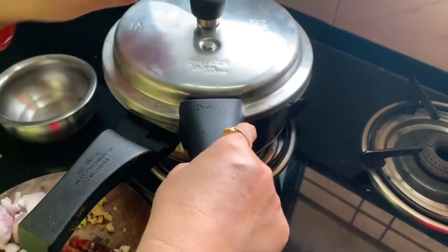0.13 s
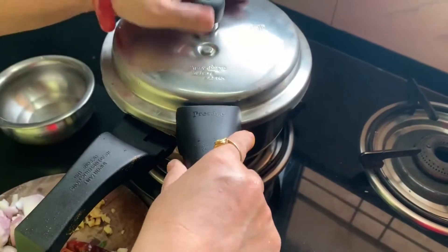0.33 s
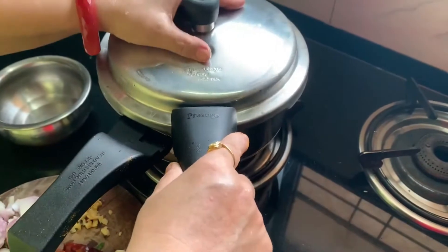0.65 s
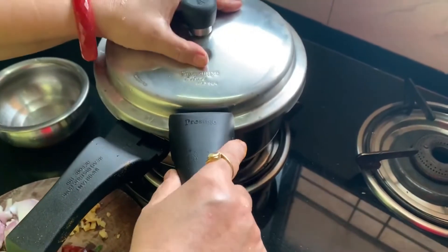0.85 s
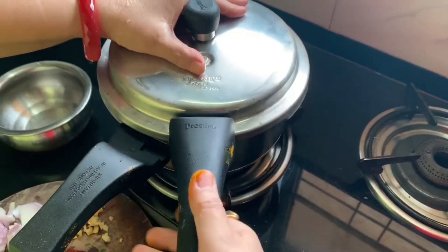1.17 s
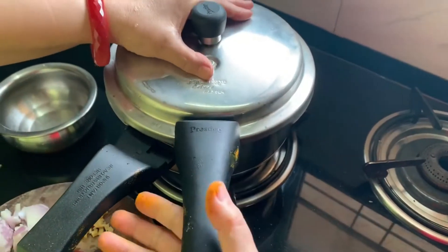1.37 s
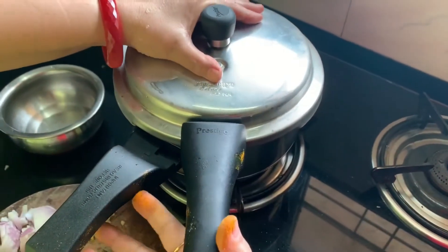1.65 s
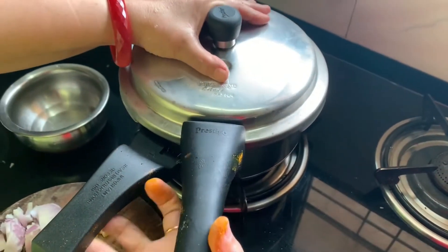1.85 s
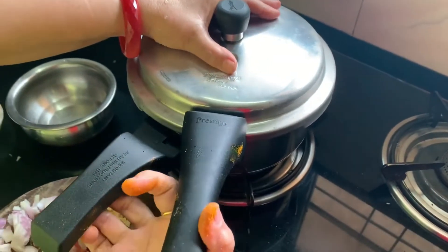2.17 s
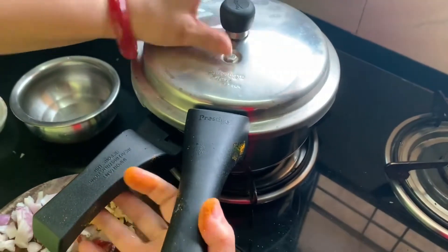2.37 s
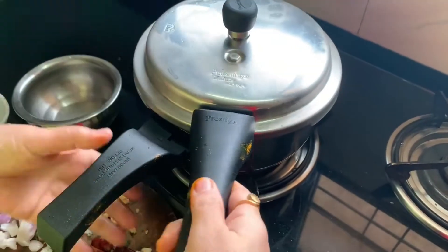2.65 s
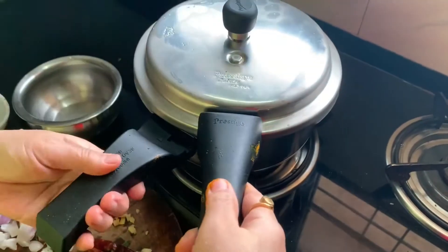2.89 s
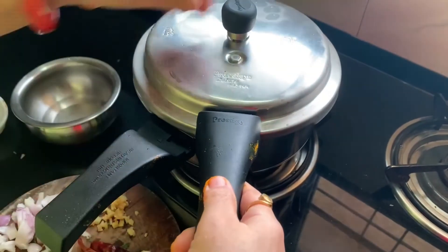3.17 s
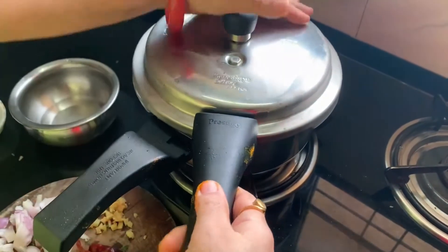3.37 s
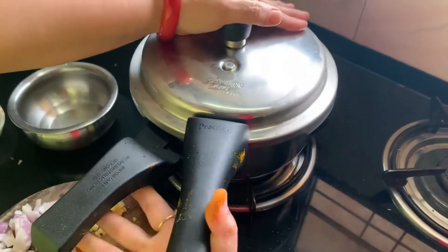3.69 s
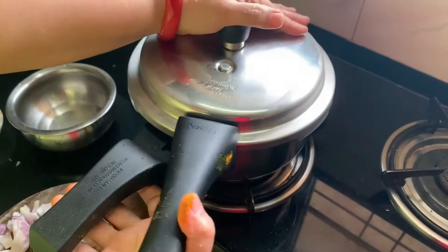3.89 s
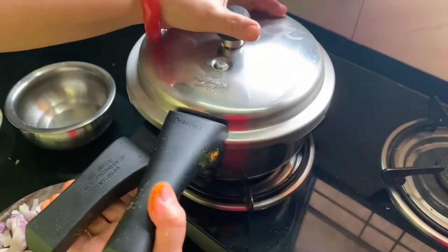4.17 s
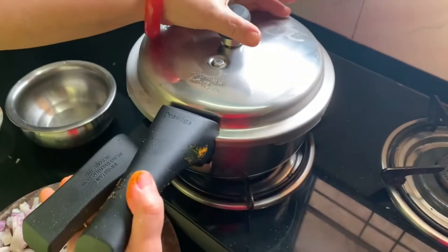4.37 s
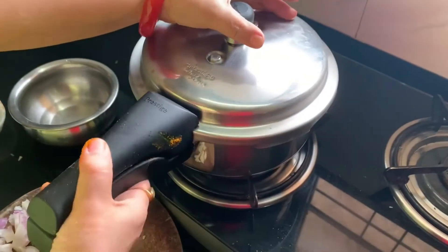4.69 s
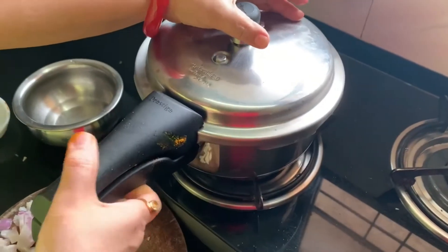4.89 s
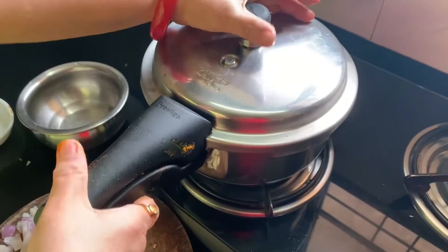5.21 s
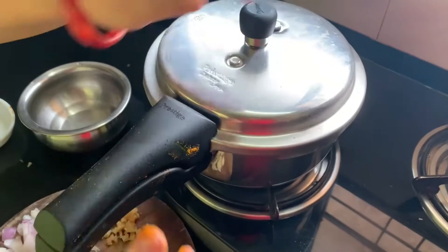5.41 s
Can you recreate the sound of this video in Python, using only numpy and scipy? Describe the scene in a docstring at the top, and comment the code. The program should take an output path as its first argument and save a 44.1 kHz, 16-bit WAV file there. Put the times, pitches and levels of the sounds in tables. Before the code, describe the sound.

A pressure cooker lid shifts on its pot with a cluster of light, hollow knocks, then scattered taps, soft thumps and the ticking of a loose fitting. A sharp, bright metal clack rings out, and a second, fuller one follows as the lid seats. Quieter handling knocks finish the action. The microphone is close, in a small kitchen with short reflections and a faint bed of hiss and rumble.

```python
"""A metal pressure cooker lid is worked into its pot and locked, close up in a small kitchen.
Handling gives dull knocks (a contact, a clonk of the handle, the pot's low answer) and soft bumps as
the pot rocks on the stove. A loose fitting ticks, and the rim clacks, bounces and rings, twice loudly.
How firmly the lid sits shapes the ring, the bounces and the bass of the knocks.
Hiss and a low room rumble lie underneath."""
import sys
import numpy as np
from scipy import signal
from scipy.fft import rfft, irfft
from scipy.io import wavfile
from scipy.ndimage import uniform_filter1d

SR = 44100
rng = np.random.default_rng(int(sys.argv[2]) if len(sys.argv) > 2 else 0)


def put_to_file(sound):
    """Save the sound as 16-bit audio at rate SR, in the file named by the first command-line argument."""
    columns = np.atleast_2d(sound).T  # one column per channel
    safe = np.clip(columns, -1, 1)
    whole_steps = np.round(safe * 32767)
    wavfile.write(sys.argv[1], SR, whole_steps.astype(np.int16))


N = 244710
T = np.arange(SR * 2 // 3) / SR  # time axis of one hit
LEAD_S = .02  # scuff before a blow peaks


def amp(db):
    """Decibels to gain."""
    return 10 ** (np.asarray(db) / 20)


def curve_at(points, hz):
    """Reads a breakpoint curve on a log-frequency axis."""
    freqs, values = np.transpose(points)
    return np.interp(np.log(hz + 1), np.log(freqs), values)


def add(mix, start_s, sound):
    """Lays a stereo sound into the mix."""
    part = mix[:, max(round(start_s * SR), 0):][:, :sound.shape[1]]
    part += sound[:, :part.shape[1]]


def eq(x, points):
    """Filters x by a curve of (freq_hz, gain_db)."""
    size = x.shape[-1]
    return irfft(rfft(x) * amp(curve_at(points, np.fft.rfftfreq(size, 1 / SR))), size)


def normalise(x):
    """Scales a stereo hit to the energy of 20 ms at rms 1."""
    return x / np.sqrt((x ** 2).sum() / (2 * SR * .02))


def decay(t60_s):
    """Exponential fade, 60 dB down at t60_s."""
    return np.exp(-np.log(1000) * T / t60_s)


def blow(attack_s, t60_s):
    """Envelope: surfaces scuff with growing force, meet at LEAD_S, and the sound dies."""
    return np.exp(np.minimum((T - LEAD_S) / attack_s, -np.log(1000) * (T - LEAD_S) / t60_s))


# Stereo image of the room, centred bass and wide treble: freq_hz, correlation
ROOM_IMAGE = [(60, 0.98), (160, 1), (300, 0.98), (600, 0), (1100, 0.2), (12000, 0)]
def noise(spectrum, size, image=ROOM_IMAGE):
    """Coloured stereo noise of rms 1, its width set band by band."""
    left, spare = rfft(rng.standard_normal((2, size)))
    alike = np.clip(curve_at(image, np.fft.rfftfreq(size, 1 / SR)), -1, 1)
    right = alike * left + np.sqrt(1 - alike ** 2) * spare
    x = eq(irfft(np.array([left, right]), size), spectrum)
    return x / x.std()


# Colour of the hiss and rumble: freq_hz, gain_db
BED_SPECTRUM = [(25, -13), (50, 4.5), (90, 7), (160, 10.5), (250, 4.5), (400, 4.5), (530, -0.5), (700, 3),
                (950, 1.5), (1300, 2), (1900, -2.5), (3000, 0), (6500, 0), (7500, 1), (8400, -2),
                (10000, 2.5), (11500, -1.5)]
# Stereo image of the bed: freq_hz, correlation
BED_IMAGE = [(60, 1), (160, .99), (300, 0.79), (600, 0.11), (1100, -0.2), (7300, 0.34), (7750, -1),
             (9050, -1), (9700, 0.78)]
# How much each band swells: freq_hz, depth_ratio
BED_SWELL = [(200, .9), (900, .8), (2200, 1), (5000, .7)]
def room_tone(level_db=-42, swell_db=3.4):
    """A bed of hiss and low rumble that swells in irregular patches of time and frequency."""
    hz, t, bands = signal.stft(noise(BED_SPECTRUM, N, BED_IMAGE), SR, nperseg=1024)
    patches = uniform_filter1d(rng.standard_normal((len(t), len(hz))), size=12, axis=0)
    patches = uniform_filter1d(patches, size=6, axis=1).T
    swell = amp(swell_db * curve_at(BED_SWELL, hz)[:, None] * patches / patches.std())
    return amp(level_db) * signal.istft(bands * swell, SR, nperseg=1024)[1][:, :N]


def strike(modes, attack_s, spread_db=2.5, right_lag_s=0.00018):
    """Damped modes set off by one blow, with a new balance and slight detuning each time."""
    t = T - LEAD_S - np.array([[0], [right_lag_s]])
    ring = 0
    for hz, t60_s, db in modes:
        envelope = amp(db + spread_db * rng.standard_normal()) * blow(attack_s, t60_s)
        cycles = hz * rng.uniform(1.0, 1.015) * t + rng.random()
        ring = ring + envelope * np.sin(2 * np.pi * cycles)
    return normalise(ring)


def focus(modes, focus_hz, db_per_octave=-11.5):
    """The place of a blow brings out the modes near one pitch."""
    return [(hz, t60_s, db + db_per_octave * abs(np.log2(hz / focus_hz))) for hz, t60_s, db in modes]


# Harder knocks build up faster: contact_db, attack_s
CONTACT_ATTACK = [(-42, 0.0056), (-40, 0.0035)]
# Modes of the hollow pot wall: pitch_hz, t60_s, level_db
WALL_MODES = [(1370, 0.039, -4), (1717, 0.033, 2), (2040, 0.087, 3.5), (2250, 0.11, 1), (2610, 0.078, 0),
              (3025, 0.052, 1)]
# Dense modes that blur into a thud: freq_hz, gain_db
THUD_SPECTRUM = [(100, -29), (250, -6), (420, 0), (530, -0.5), (750, 0), (1100, -0.5), (1500, -1),
                 (1850, -1.5), (2400, 0.5), (3200, -2.5), (4200, -12), (6500, -9), (12000, -69)]
def contact(level_db, treble_db):
    """The front of a knock: the hollow pot wall and a dense thud, under a treble shelf."""
    attack_s = np.interp(level_db, *np.transpose(CONTACT_ATTACK))
    wall = amp(-2.5) * strike(WALL_MODES, attack_s)
    thud = amp(1.5) * normalise(noise(THUD_SPECTRUM, len(T)) * blow(attack_s, 0.1))
    return amp(level_db) * eq(wall + thud, [(800, 0), (2400, treble_db)])


# Modes of the handles: pitch_hz, t60_s, level_db
HANDLE_MODES = [(625, 0.073, -3), (694.5, 0.039, 0), (800, 0.059, -3.5), (870, 0.048, -3),
                (1002, 0.047, -3.5), (1082.6, 0.11, -1.5), (1140, 0.13, 0)]
def handle_clonk(focus_hz):
    """A short, woody clonk from the handle where the knock lands."""
    return strike(focus(HANDLE_MODES, focus_hz), attack_s=.0015)


# The lid being worked into the pot: time_s, seat_ratio
LID_SEATING = [(0, 0.2), (2.6, 0.32), (3.34, 0.038), (3.85, 0.1), (3.98, 0.54), (4.08, 0.9), (4.56, 0.64),
               (5.2, 0.45)]
def seating(time_s):
    """How firmly the lid sits, from 0 (loose) to 1 (pressed home)."""
    return np.clip(np.interp(time_s, *np.transpose(LID_SEATING)), 0, 1)


# Modes of the cooker standing on the stove: pitch_hz, t60_s, level_db
BODY_MODES = [(191, 0.12, -8), (249, 0.039, 0), (279.6, 0.11, -0.5), (304.2, 0.12, -1), (347, 0.037, 0.5),
              (403, 0.14, -2), (434, 0.11, -0.5)]
# Thump of the stove under it: freq_hz, gain_db
STOVE_SPECTRUM = [(30, -26), (90, -0.5), (160, 10.5), (300, -8), (700, -20), (2000, -62)]
def pot_body(focus_hz, seat, attack_s=0.0061, seated_bass_db=-15.5):
    """The whole cooker swings in its low modes and thumps the stove; a seated lid cuts the thump."""
    thump = normalise(noise(STOVE_SPECTRUM, len(T)) * blow(attack_s, 0.054))
    return strike(focus(BODY_MODES, focus_hz), attack_s) + amp(seated_bass_db * seat) * thump


# Handling knocks: hit_s, contact_db, treble_db, body_db, body_focus_hz, clonk_db, clonk_focus_hz
KNOCK_CUES = [(.046, -39, -15, -36.5, 198, -43.5, 1090), (.084, -45, -10, -38.5, 217, -50, 1090),
              (0.242, -42, -2, -38.5, 303, -48, 946), (0.257, -47, -2, -46, 290, -50, 700),
              (0.275, -47, -12, -56, 195, -41.5, 1000), (.316, -38, -6.5, -48, 435, -41, 800),
              (.407, -41, -4.5, -40, 240, -45, 870), (.437, -45, -5, -38.5, 190, -45, 1100),
              (.599, -42, -6.5, -38.5, 290, -45, 860), (.7314, -31.5, 0.5, -30, 440, -33, 710),
              (.738, -35, -2.5, -32.5, 434, -47, 700), (1.063, -49, -20, -45.5, 180, -51, 1140),
              (1.105, -38, 2, -33, 406, -41, 950), (1.489, -45.5, 3, -62, 296, -64, 800),
              (1.494, -38.5, -1, -31.5, 300, -37.5, 1120), (1.68, -40, -7, -40, 270, -50, 1090),
              (1.732, -61, -6, -44.5, 195, -54, 800), (1.779, -60, -6, -53, 188, -59, 800),
              (1.977, -54, 8.5, -43, 277, -51, 706), (2.249, -37.5, -7.5, -36.5, 394, -43.5, 640),
              (2.587, -37.5, -8, -36.5, 224, -37, 800), (2.629, -51, 1.5, -43, 286, -56, 800),
              (2.722, -44, -7, -41, 288, -51, 1090), (3.076, -45, -8, -45, 296, -51, 754),
              (3.224, -40.5, -14, -38.5, 396, -47, 800), (3.335, -40, -7, -39, 200, -45, 680),
              (3.846, -35, -12, -30.5, 370, -41, 690), (3.977, -37.5, -3, -33, 370, -38.5, 700),
              (4.081, -26.5, -4, -39, 310, -26.5, 656), (4.144, -38.5, 1.5, -34.5, 330, -39, 870),
              (4.492, -40, -14.5, -40, 390, -43, 690), (4.562, -38.5, -7, -44, 403, -45, 1090),
              (4.964, -45, -4, -41.5, 344, -43, 1000), (5.025, -40, -2, -36.5, 257, -42, 905),
              (5.197, -38, -3, -33.5, 435, -37.5, 785), (5.205, -39.5, -3.5, -35.5, 247, -45, 680)]
def knocks(body_lag_s=0.0054):
    """Each knock layers a quick contact and a handle clonk; the heavy pot answers just after."""
    out = np.zeros((2, N))
    for hit_s, contact_db, treble_db, body_db, body_hz, clonk_db, clonk_hz in KNOCK_CUES:
        add(out, hit_s - LEAD_S, contact(contact_db, treble_db))
        add(out, hit_s - LEAD_S, amp(clonk_db) * handle_clonk(clonk_hz))
        add(out, hit_s + body_lag_s - LEAD_S, amp(body_db) * pot_body(body_hz, seating(hit_s)))
    return out


# Soft bumps of the pot on the stove: start_s, gain_db, pitch_hz
BUMP_CUES = [(0.276, -36.5, 113.5), (0.444, -42.5, 103.7), (1.497, -44, 87), (1.738, -41, 142),
             (2.586, -33.5, 109.5), (2.659, -41, 88.8), (2.923, -45, 167), (2.971, -42, 146.4),
             (3.267, -44.5, 159), (3.333, -27, 158), (3.854, -36.5, 148), (5.157, -40.5, 160.4)]
def bumps(hum_db=-18.5):
    """The whole pot rocks briefly at one low pitch, the lower the longer, then hums on faintly."""
    out = np.zeros((2, N))
    for start_s, db, hz in BUMP_CUES:
        t60_s = 0.093 * (106 / hz) ** 2
        envelope = (decay(t60_s) + amp(hum_db) * decay(t60_s=1)) * (1 - decay(0.0015))
        tone = 2 * np.sin(2 * np.pi * hz * T)
        add(out, start_s, amp(db) * tone * envelope * np.ones((2, 1)))
    return eq(out, [(30, -22), (95, 3.5)])


def beating_pair(hz, detune_ratio, twin_gain=.4):
    """Two close partials of one metal mode, spread in phase between left and right."""
    width = np.arccos(np.clip(curve_at(ROOM_IMAGE, hz), -1, 1))
    side = np.array([[-.5], [.5]]) * width * rng.choice([-1, 1])
    twin_hz = hz * (1 + detune_ratio * rng.uniform(0.72, 1) * rng.choice([-1, 1]))
    phase = rng.uniform(0, 2 * np.pi)
    twin = twin_gain * np.cos(2 * np.pi * twin_hz * T + phase - side)
    return np.sin(2 * np.pi * hz * T + phase + side) + twin


# Dense modes of a metal impact: freq_hz, gain_db
CRACK_SPECTRUM = [(80, -20), (300, 10), (1000, 5.5), (2500, 0.5), (3600, 0.5), (5000, 0), (7000, 3),
                  (9000, -2), (11000, 11.5), (12500, -1)]
def crack(attack_s, t60_s, grain_db=2.5):
    """The bright, grainy burst of metal meeting metal."""
    grain = amp(grain_db * np.repeat(rng.standard_normal(len(T) // 30 + 1), 30)[:len(T)])
    return normalise(noise(CRACK_SPECTRUM, len(T)) * grain * blow(attack_s, t60_s))


# Modes of the loose fitting: pitch_hz, t60_s, level_db
FITTING_MODES = [(1106, 0.037, -4.5), (1387, 0.031, -4), (1495, 0.035, 3), (1664, 0.07, -2.5),
                 (2710, 0.08, -12), (3180, 0.22, -20), (4400, 0.13, -15.5), (6780, 0.043, -9.5)]
# Ticks on the lid and handle: hit_s, ping_db, crack_db, pitch_ratio
TICK_CUES = [(0.334, -34, -44, 0.85), (1.975, -38, -39, 0.91), (2.019, -40, -50, 0.98),
             (2.039, -44, -59, 0.95), (2.062, -49, -64, 0.87), (3.146, -46, -67, 0.82),
             (3.3162, -22.5, -24.5, 0.97), (4.964, -40, -68, 0.66)]
def ticks():
    """A small loose part gives a sharp crack and a short ping, a little to the left."""
    out = np.zeros((2, N))
    for hit_s, ping_db, crack_db, pitch_ratio in TICK_CUES:
        ping = sum(amp(db) * beating_pair(hz * pitch_ratio, 0.012) * (decay(t60_s) - decay(0.0038))
                   for hz, t60_s, db in FITTING_MODES)
        add(out, hit_s, amp(ping_db) * normalise(ping) * amp([[1.5], [-2]]))
        add(out, hit_s - LEAD_S, amp(crack_db) * crack(attack_s=0.00019, t60_s=0.16))
    return out


def by_seat(seat, loose, home):
    """Blends a setting between the loose lid and the lid pressed home."""
    return (1 - seat) * loose + seat * home


def chatter(rate_hz=90):
    """The irregular flutter of a loose lid on the rim."""
    knots_s = np.arange(0, 1, 1 / rate_hz)
    flutter = np.interp(T, knots_s, rng.standard_normal(SR // 100)[:len(knots_s)])
    return flutter / flutter.std()


# Modes of lid and pot: pitch_hz, t60_s, loose_db, home_db
LID_MODES = [(665, 0.35, -15, -1), (950, 0.61, -18, -3), (1088, 0.23, -9, -17), (1182, 0.47, -5.5, -8),
             (1228, 0.8, 1, -9), (1295, 0.65, 3, -2), (1375, 0.3, -9, -10), (1448, 0.3, -12, -4),
             (1654, 0.55, -5, 10), (1717, 0.3, -13, -7), (2160, 0.46, -1, -13), (2183, 0.25, -16, 2.5),
             (2310, 0.26, -4, -13), (3176, 0.57, -0.5, -15), (3280, 0.5, -11, -10), (3990, 0.36, -4, -12),
             (4340, 0.27, -25, -1.5), (4740, 0.34, 0, -4), (5720, 0.4, -1.5, -4), (6500, 0.22, 3, -13),
             (7070, .2, -9, -20), (7410, .25, 1, 1.5), (8800, .18, -27, -20), (9360, .18, -4, -8),
             (10200, .18, -4, 8)]
# Where the lid radiates, as a boost on the left and an equal cut on the right: freq_hz, pan_db
LID_PAN = [(700, 7), (1150, 3), (2100, 1.5), (3700, -2.5), (10000, 1.5)]
def lid_ring(seat, sings):
    """Hand and contact choke the ring, treble first; if it sings, a weak tail carries on."""
    choke_s = by_seat(seat, loose=0.068, home=0.11)
    main_hz = by_seat(seat, loose=1270, home=1654)
    chatter_depth = by_seat(seat, loose=.7, home=0)
    ring, attack = 0, 1 - decay(0.0066)
    for hz, t60_s, loose_db, home_db in LID_MODES:
        fade = decay(choke_s * (main_hz / hz) ** 0.34)
        if sings:  # a seated lid needs less grip, so its tail is stronger
            tail_db = by_seat(seat, loose=-15.5, home=-9.5) - 9 * abs(np.log2(hz / main_hz))
            fade = fade + amp(tail_db) * decay(t60_s) * (1 + chatter_depth * chatter())
        db = by_seat(seat, loose_db, home_db) + np.array([[1], [-1]]) * curve_at(LID_PAN, hz)
        ring = ring + amp(db) * beating_pair(hz, 0.0066) * fade * attack
    return normalise(ring)


# The rim striking the pot: hit_s, ring_db, crack_db, attack_s
CLACK_CUES = [(0.3343, -40.5, -37, 0.00073), (2.584, -41.5, -32.5, 0.016), (3.158, -42, -70, 0.012),
              (3.333, -19, -19, 0.0011), (3.839, -39, -32, 0.0064), (3.984, -33, -55, 0.0058),
              (4.0794, -18.5, -23.5, 0.0015), (4.084, -36, -22, 0.00058)]
def clacks(bounces=2, gap_ratio=0.62, crack_step_db=-12.5):
    """The rim strikes and bounces, each time sooner and weaker; a seated lid hardly bounces."""
    out = np.zeros((2, N))
    for hit_s, ring_db, crack_db, attack_s in CLACK_CUES:
        seat = seating(hit_s)
        first_gap_s = by_seat(seat, loose=.0185, home=.0135)
        ring_step_db = by_seat(seat, loose=-4.5, home=-10.5)
        for k in range(bounces + 1):
            add(out, hit_s, amp(ring_db + k * ring_step_db) * lid_ring(seat, sings=k == 0))
            add(out, hit_s - LEAD_S, amp(crack_db + k * crack_step_db) * crack(attack_s, t60_s=0.047))
            hit_s += first_gap_s * gap_ratio ** k
    return out


# Reverb time of the kitchen: freq_hz, t60_s
KITCHEN_DECAY = [(100, 0.63), (260, 0.32), (700, 0.42), (2000, 0.37), (5000, 0.31), (11000, 0.086)]
def kitchen_reverb(send):
    """Diffuse reflections from tiles and worktop; the treble dies first."""
    hz, t, bands = signal.stft(noise([(20, 0), (20000, 0)], SR), SR, nperseg=256)
    fade = np.exp(-np.log(1000) * t / curve_at(KITCHEN_DECAY, hz)[:, None])
    tail = signal.istft(bands * fade, SR, nperseg=256)[1][:, :len(T)]
    tail = tail * (1 - decay(0.013))  # reflections take a moment to build
    return signal.fftconvolve(send, tail / np.linalg.norm(tail[0]), axes=1)[:, :N]


def scene():
    """The mix: dull sounds fill the room more than the near metal does."""
    dull, low, metal = knocks(), bumps(), clacks() + ticks()
    send = amp(-7.0) * dull + amp(-6.5) * low + amp(-13.5) * metal
    return dull + low + metal + kitchen_reverb(send) + room_tone()


# The microphone's bass roll-off: freq_hz, gain_db
MIC_RESPONSE = [(25, -5), (70, -0.5)]
def record(dry, cutoff_hz=12000):
    """The microphone thins the deepest bass and the recorder cuts the top treble."""
    lowpass = signal.firwin(301, cutoff_hz, window=("kaiser", 9), fs=SR)
    return signal.oaconvolve(eq(dry, MIC_RESPONSE), lowpass[None], "same")


dry = scene()
out = record(dry)
put_to_file(out)
```